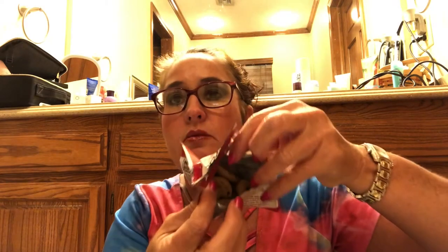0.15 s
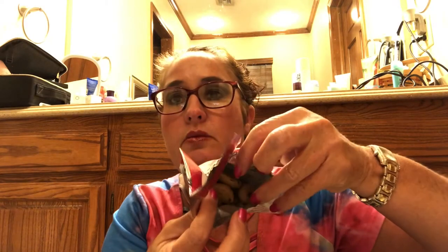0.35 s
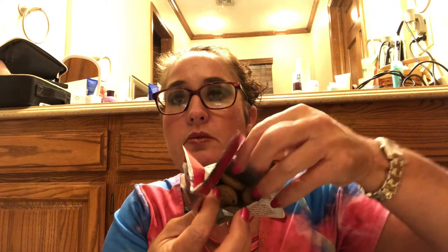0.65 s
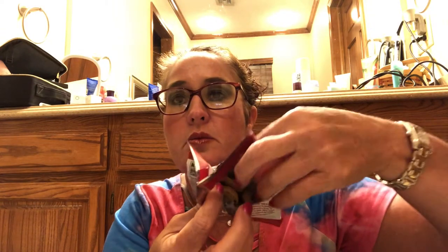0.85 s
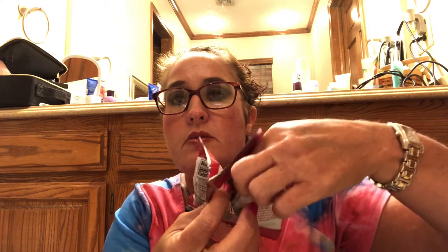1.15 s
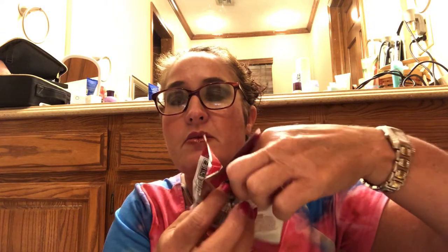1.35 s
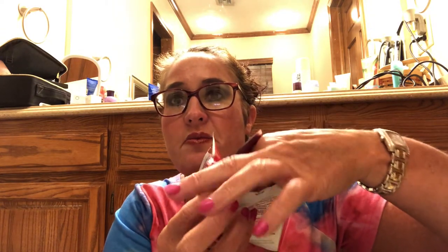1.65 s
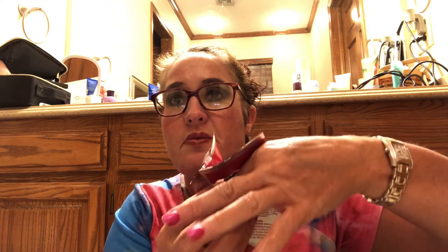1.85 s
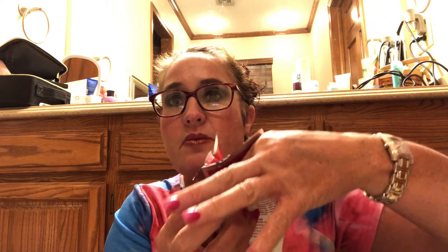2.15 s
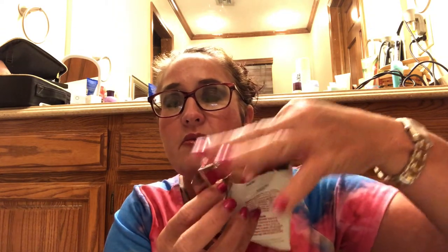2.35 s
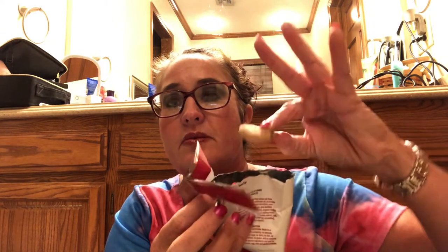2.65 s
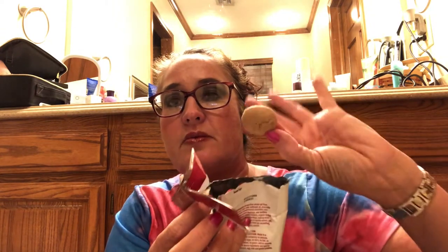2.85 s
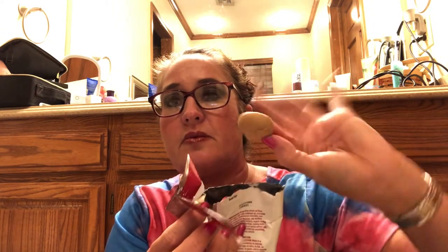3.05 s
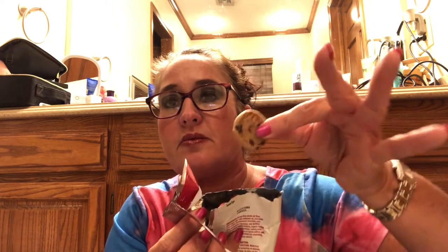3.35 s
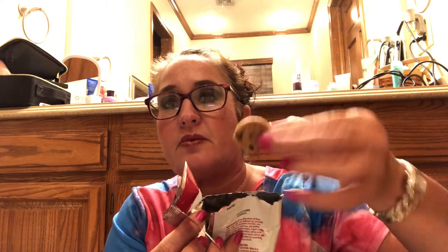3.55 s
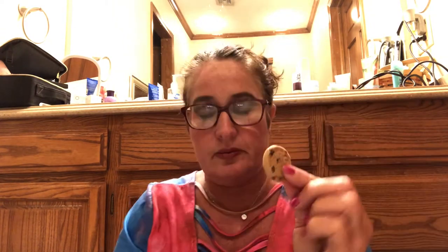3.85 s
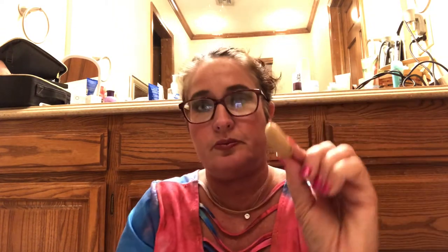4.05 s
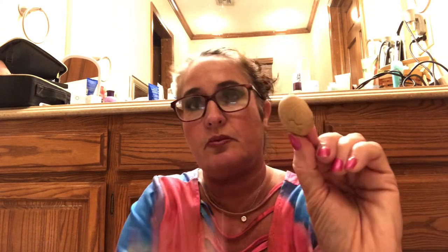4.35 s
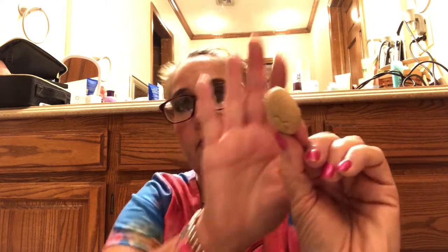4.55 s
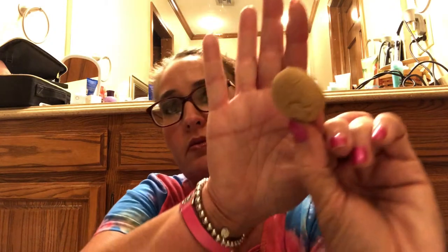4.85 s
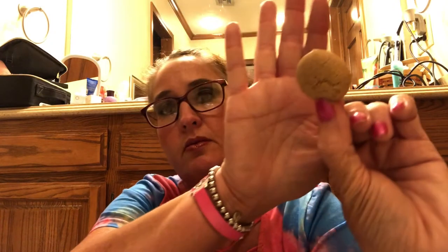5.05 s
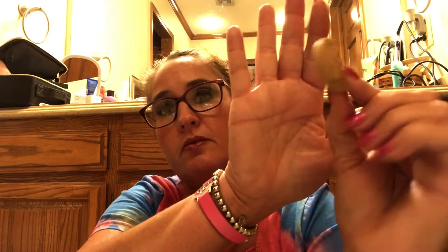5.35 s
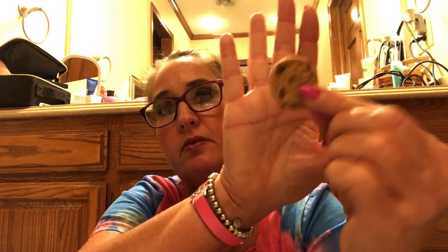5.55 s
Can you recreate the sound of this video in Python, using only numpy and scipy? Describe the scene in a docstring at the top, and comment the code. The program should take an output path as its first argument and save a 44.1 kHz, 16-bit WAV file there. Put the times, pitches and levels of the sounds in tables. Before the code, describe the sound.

A small plastic snack bag is handled close to a small microphone in a hard-walled room. Sparse crinkles grow into sharp snaps and dense rustling with soft low bumps, stop, return briefly with a final loud snap, then leave only low hiss and a faint thin whine, with short echoes after the bag sounds.

```python
"""Fingers digging in a plastic snack bag

Close up in a small hard-walled room. Film creases snap one by one, each a slip and a spray of weaker
slips through a resonant film, over grainy noise for the rustle; soft low bumps are sines plus noise puffs.
Echoes and a decaying tail follow the bag sounds. Coloured noise hisses throughout, a faint sine whines
near the end, and the level dips briefly once."""
import sys
import numpy as np
from scipy import signal
from scipy.fft import rfft, irfft, next_fast_len
from scipy.io import wavfile

SR = 44100
rng = np.random.default_rng(int(sys.argv[2]) if len(sys.argv) > 2 else 0)


def to_wav(s):
    """Save 16-bit WAV."""
    ch = np.atleast_2d(s).T  # columns
    pcm = np.round(np.clip(ch, -1, 1) * 32767)  # PCM
    wavfile.write(sys.argv[1], SR, pcm.astype(np.int16))


N = 252252


def gain_of(db):
    """Amplitude factor of a level in dB."""
    return 10 ** (np.asarray(db) / 20)


def evened(x):
    """Scales to rms 1."""
    return x / np.sqrt(np.mean(x ** 2) + 1e-20)


def peaked(x):
    """Scales to peak 1."""
    return x / np.max(abs(x))


def read(points, hz):
    """Reads a (f/Hz, value) table, linear in log frequency."""
    f, value = np.transpose(points)
    return np.interp(np.log(hz + 1), np.log(f + 1), value)


def along(points):
    """Level columns of a (t/s, level/dB...) table, one value a sample; -150 dB outside."""
    s, *columns = np.transpose(points)
    t = np.arange(N) / SR
    return [np.interp(t, s, column, -150, -150) for column in columns]


def coloured(x, points):
    """Shapes a long sound by a (f/Hz, level/dB) gain curve; rms 1."""
    size = next_fast_len(len(x))
    gain = gain_of(read(points, np.fft.rfftfreq(size, 1 / SR)))
    return evened(irfft(rfft(x, size) * gain, size)[:len(x)])


def band(x, hz, kind):
    """Second-order Butterworth filter."""
    return signal.sosfilt(signal.butter(2, hz, kind, fs=SR, output="sos"), x)


def causal(gain):
    """Minimum-phase impulse response: the shortest ringing with this gain curve."""
    log_gain = np.log(np.concatenate([gain, gain[-2:0:-1]]) + 1e-4)
    return np.fft.ifft(np.exp(log_gain - 1j * signal.hilbert(log_gain).imag)).real


def hiss():
    """Steady room and microphone noise, strongest in the bass and low mids."""
    # hiss spectrum: f/Hz, level/dB (per Hz, relative)
    spectrum = [(26, -34), (45, -8), (120, -8.5), (153, -7.5), (201, -9), (283, -4), (312, -9), (370, -4),
                (418, -8.5), (619, -11.5), (1060, -16), (1570, -21.5), (2500, -23), (15700, -35)]
    rms_db = -68
    return gain_of(rms_db) * coloured(rng.standard_normal(N), spectrum)


def effort():
    """Rustle, boom and fizz gains: grips of the hand rise, hold and sink, linearly in dB."""
    # grips: start t/s, full t/s, letting go t/s, end t/s,
    # rustle level/dB, boom of the bag's air level/dB, fizz of the finest creases level/dB
    grips = [(-0.05, 0.0, 0.023, 0.27, -68, -73, -75), (0.103, 0.25, 0.33, 0.48, -57.5, -67.5, -66.5),
             (0.51, 0.713, 0.9, 0.92, -57.5, -59, -71), (0.875, 0.927, 1.113, 1.43, -56, -60.5, -68),
             (1.355, 1.513, 1.49, 1.66, -52.5, -58, -55.5), (1.58, 1.617, 2.4, 2.13, -66.5, -73, -86),
             (1.948, 2.03, 2.05, 2.026, -47.5, -50, -62), (2.05, 2.12, 2.2, 2.295, -52.5, -54, -52),
             (2.275, 2.41, 2.49, 2.59, -52.5, -53, -58), (3.715, 3.74, 3.74, 3.864, -59.5, -67, -63.5),
             (3.813, 3.92, 4.05, 4.2, -59.5, -79, -70), (4.053, 4.095, 4.1, 4.13, -52.5, -54.5, -56),
             (4.094, 4.145, 4.11, 4.28, -47.5, -46.5, -78), (4.34, 4.493, 4.64, 4.66, -62, -67, -95),
             (4.927, 4.936, 4.957, 4.975, -76.5, -99, -65)]
    rest_db = -16  # start and end, relative to full
    total = 0
    for start_s, full_s, release_s, end_s, *db in grips:
        # end before release: cut off at the end; release before full: joins the sinking line at full
        shape = zip((start_s, full_s, release_s, end_s), (rest_db, 0, 0, rest_db))
        curve = [(s, *(np.array(db) + change_db)) for s, change_db in shape]
        total = total + gain_of(along(curve))
    return total


def crackle(per_s, spread_db, t60):
    """Noise in small dying grains, a few of them large."""
    grain_db = spread_db * np.minimum(rng.exponential(1, N), 3.5)
    starts = gain_of(grain_db) * (rng.random(N) < per_s / SR)
    decay = gain_of(-60 * np.arange(4096) / SR / t60)
    power = signal.oaconvolve(starts ** 2, decay ** 2)[:N]
    return np.sqrt(abs(power)) * rng.standard_normal(N)


def rustle():
    """Countless small creases slip under the fingers, patch by patch, while the bag's air is squeezed."""
    # patches of film: f/Hz, half width/octaves, level/dB
    patches = [(1320, 0.31, 1), (2350, 0.39, 0.5), (4090, 0.3, 2.5), (6400, 0.22, -4.5)]
    # spectrum of the squeezed air: f/Hz, level/dB (per Hz, relative)
    boom_spectrum = [(40, -23), (100, -4.5), (200, -1.5), (450, 0), (900, -5.5), (1500, -19)]
    # spectrum of the finest creases: f/Hz, level/dB (per Hz, relative)
    fizz_spectrum = [(5000, -33), (7500, 1), (9500, -7.5), (11800, -6), (13000, -2.5), (16500, -1.5)]
    rustle_gain, boom_gain, fizz_gain = effort()
    film = np.zeros(N)
    for hz, half_oct, db in patches:
        edges_hz = hz * 2. ** np.array([-half_oct, half_oct])
        film += gain_of(db) * band(crackle(per_s=260, spread_db=3.5, t60=0.023), edges_hz, "band")
    air = boom_gain * coloured(crackle(per_s=200, spread_db=2.6, t60=.03), boom_spectrum)
    fizz = fizz_gain * coloured(crackle(per_s=700, spread_db=4, t60=.01), fizz_spectrum)
    return rustle_gain * evened(film) + air + fizz


def bumps():
    """Fingers bump the bag and the snacks in it: a dying low sine plus a puff of noise around it."""
    # bumps: t/s, dry peak level/dB, f/Hz
    pushes = [(0.017, -51, 132), (0.202, -49, 229), (0.324, -40.5, 235), (0.63, -43, 174), (0.77, -43, 214),
              (1.03, -52, 86.5), (1.289, -53.5, 632), (1.418, -45, 244), (1.539, -47, 260),
              (2.102, -35.5, 270.7), (2.533, -46, 160), (4.553, -47.5, 232)]
    t60_s, attack_s = .11, 0.00062
    out, t = np.zeros(N), np.arange(8192) / SR
    fade = gain_of(-60 * t / t60_s)
    for s, db, hz in pushes:
        noise = rng.standard_normal(len(t)) * fade * (1 - np.exp(-t / attack_s))
        puff = peaked(band(noise, [.5 * hz, 3.35 * hz], "band"))
        push = np.sin(2 * np.pi * hz * t) * fade + 2.2 * puff
        out[round(s * SR):][:len(t)] += gain_of(db) * peaked(push)
    return out


def snap(db, hz, overtone_hz, overtone_db, bright_db):
    """One sharp slip and a spray of weaker ones ring the film; returns direct sound and room feed."""
    spray, spray_t60_s, room_share_db = 0.15, 0.019, -7
    thump_db = -21 - 0.58 * bright_db  # a dull crease pumps the bag's air more
    t, f = np.arange(1024) / SR, np.fft.rfftfreq(2048, 1 / SR) + 1
    # f/Hz, half width/octaves, level/dB: ring, overtone, air, film, crease
    bumps_of_gain = [(hz, 0.25, 0), (overtone_hz, .2, overtone_db),
                     (707, 0.76, thump_db), (2520, 0.89, -8.5), (8800, 1.0, bright_db)]
    power = sum(gain_of(level_db) ** 2 * np.exp(-(np.log2(f / centre_hz) / half_oct) ** 2)
                for centre_hz, half_oct, level_db in bumps_of_gain)
    ring = causal(np.sqrt(power))[:1024]
    slips = spray * rng.standard_normal(len(t)) * gain_of(-60 * t / spray_t60_s)
    slips[0] = 1
    ahead = signal.fftconvolve(slips, ring)
    ahead *= np.linalg.norm(ring) / np.linalg.norm(ahead)  # the spray spreads the energy, adds none
    around = gain_of(room_share_db) * np.pad(ring, (0, 1023))
    return gain_of(db) * np.array([ahead, around]) / np.max(abs(ahead))


def snaps(count=160):
    """Large creases buckle at set moments, small ones at random, as strong as the grip."""
    # large creases: t/s, dry peak level/dB, ring f/Hz, overtone f/Hz, overtone level/dB, brightness level/dB
    creases = [(0.022, -39.5, 1120, 3220, 1, -45), (0.045, -39, 1500, 3910, -11, -27),
               (0.179, -38, 1000, 4310, 2.5, -10), (0.202, -36.5, 1470, 3200, -21, -24),
               (0.231, -32, 1560, 4400, -22, -44), (0.245, -31, 1640, 3930, -6, -24),
               (0.296, -31.5, 2260, 4500, -17, -21), (0.325, -31, 1510, 4600, -4, -30),
               (0.336, -29.5, 1250, 3280, -11, -28), (0.521, -45, 2500, 4490, 3, -8.5),
               (0.554, -39, 1680, 5570, -9, -16), (0.6, -34.5, 1679, 3800, -3, -28),
               (0.632, -34, 1410, 3670, -13, -34), (0.674, -27, 1400, 3880, -22, -34.5),
               (0.75, -30, 2370, 4140, 0, -31), (0.781, -25.5, 1240, 5040, -8, -13.5),
               (0.817, -32, 1590, 3290, -10, -16), (0.927, -31, 1620, 5310, -17, -15),
               (0.944, -32.5, 2460, 4230, 0, -4), (0.965, -29.5, 3050, 4840, -2, -24),
               (1.018, -35, 1140, 4260, 10, -11), (1.08, -34, 1870, 3950, -12, -32),
               (1.139, -10.5, 2600, 7100, -4.5, -8.5), (1.382, -34, 1500, 3370, -18, -37),
               (1.397, -35, 920, 3810, -24, -49), (1.418, -23.5, 2970, 3920, 3, -14),
               (1.434, -7.5, 1850, 4340, 3, -6), (1.495, -21.5, 2370, 4170, 18, 7),
               (1.548, -33, 1630, 3750, -17, -36), (1.56, -31.5, 1020, 3970, -30, -24),
               (1.647, -27.5, 1180, 7800, -7.5, -18), (1.699, -36.5, 2360, 4250, -22, -34),
               (1.719, -37, 1580, 3590, -1, -14), (1.738, -31, 1900, 4160, -19, -26.5),
               (1.804, -41, 2800, 6490, 8, 0), (1.815, -17.5, 2080, 5350, 7, -4),
               (1.927, -28, 1700, 3670, 1.5, -24), (1.947, -38, 1230, 3820, -15, -35),
               (1.974, -22.5, 2670, 3600, 3.5, -9.5), (1.989, -27, 1850, 6150, -15, -15),
               (2.007, -18, 2700, 7000, -2.5, -15), (2.045, -25.5, 1740, 4270, -9, -28.5),
               (2.075, -17, 1490, 4200, -1.5, -22.5), (2.092, -24.5, 2980, 5880, 1, -21),
               (2.107, -20, 2420, 5830, 1, -15), (2.204, -35, 1560, 3200, -10, -15),
               (2.243, -15, 1580, 3500, 5.5, -7), (2.264, -27.5, 1930, 4030, -12, -45),
               (2.311, -23.5, 1800, 3390, -24, -29), (2.363, -38.5, 1410, 5560, 0, -16),
               (2.387, -32.5, 2520, 3260, -5, -24), (2.402, -29.5, 1560, 3810, -17, -37),
               (2.434, -34, 1570, 3990, -16, -23), (2.485, -18.5, 1380, 3900, -29, -31.5),
               (2.519, -27.5, 1380, 4020, -8, -6), (2.551, -27.5, 2560, 3580, -25, -27),
               (2.67, -47, 2790, 3740, 1, -17), (2.805, -41.5, 1440, 5630, 1.5, -10.5),
               (2.839, -34.5, 1800, 4820, -19, -35), (3.378, -27, 1760, 3570, -2.5, -35.5),
               (3.758, -42.5, 2220, 3260, -14, -24), (3.779, -38, 1480, 3670, -1, -19),
               (3.795, -31, 1330, 4360, 4, -6), (3.841, -41, 2480, 3760, -6, -16),
               (3.868, -33, 2770, 6850, 0, -19), (3.878, -28.5, 2150, 3930, -8, -26.5),
               (3.904, -26.5, 2870, 3920, 0, -21), (3.972, -34.5, 1940, 3850, -21, -32),
               (4.037, -30, 2160, 3470, -20, -26.5), (4.075, -33.5, 2460, 6040, -1, 10),
               (4.104, -27.5, 2480, 3200, -10, -25), (4.143, -23, 1640, 3300, -4.5, -23),
               (4.152, -28, 910, 3500, -14, -35), (4.16, -26.5, 1210, 2900, -4, -39),
               (4.212, -34.5, 2450, 3520, 15, -39), (4.444, -45.5, 1030, 3400, -24, -21),
               (4.489, -37.5, 1450, 3370, 1, -44), (4.546, -15, 2760, 4470, 2.5, -10.5)]
    small_db, small_range_db = 24, 10.5  # largest peak over the rustle gain, range below it
    # (low, high): t/s, ring f/Hz, overtone f/Hz, overtone level/dB, brightness level/dB, luck
    small_ranges = [(0, N / SR), (1000, 2690), (3350, 5800), (-24, -1.5), (-40.5, -11.5), (0, 1)]
    out, grip = np.zeros((2, N + 2048)), effort()[0]
    for s, *row in creases:
        out[:, round(s * SR):][:, :2047] += snap(*row)
    low, high = np.transpose(small_ranges)
    for s, *colour, luck in low + (high - low) * rng.random((count, 6)):
        at = int(s * SR)
        out[:, at:at + 2047] += grip[at] * snap(small_db - small_range_db * luck, *colour)
    return out[:, :N]


def room(ahead, around, wet_db):
    """Near echoes, then sparse taps of random sign, each band dying at its own speed."""
    # decay: f/Hz, t60/s
    decay = [(150, 0.22), (800, 0.4), (2000, 0.48), (5500, 0.5), (9000, 0.3), (15000, 0.12)]
    # initial tail spectrum: f/Hz, level/dB
    colour = [(150, -0.5), (600, 1), (1500, 1), (4000, -4.5), (8000, 1), (15000, -4)]
    # echoes off hands, chest and cupboard: t/s, level/dB (before the treble loss)
    echoes = [(.0021, -19), (.0037, -16.5), (.0062, -13.5), (0.013, -17)]
    taps, near = np.zeros(SR), np.zeros(1024)
    at = np.arange(200, SR - 10, 10) + rng.integers(0, 10, (SR - 201) // 10)
    taps[at] = rng.choice([-1., 1.], len(at))
    hz, t, z = signal.stft(taps, SR, nperseg=256)
    tail_db = read(colour, hz)[:, None] - 60 * t / read(decay, hz)[:, None]
    tail = signal.istft(z * gain_of(tail_db), SR, nperseg=256)[1]
    for s, db in echoes:
        near[round(s * SR)] = gain_of(db)
    near = band(near, 10000, "low")  # skin and cloth soak up the treble
    near[0] = 1  # direct sound
    ringing = gain_of(wet_db) * signal.fftconvolve(around, tail / np.linalg.norm(tail))
    return signal.oaconvolve(ahead, near)[:N] + ringing[:N]


def whine():
    """A thin steady-pitched sine that swells and fades near the end."""
    # whine: t/s, rms level/dB
    swell = [(4.8, -92), (4.82, -79.5), (5.114, -80), (5.152, -87), (5.23, -76), (5.37, -72.5),
             (5.512, -70), (5.576, -85), (5.64, -90), (5.688, -81), (5.72, -73)]
    hz = 1113
    tone = np.sqrt(2) * np.sin(2 * np.pi * hz * np.arange(N) / SR)
    return gain_of(along(swell)[0]) * tone


def scene():
    """Bag sounds in the room, over hiss and whine; one channel."""
    rubbing, pushes = rustle(), bumps()
    bag = room(*snaps(), wet_db=0.5)
    bag += room(pushes, pushes, wet_db=-4.0)
    bag += room(rubbing, rubbing, wet_db=-2.5)
    return (bag + hiss() + whine())[None]


def record(dry):
    """The small microphone drops the deep bass; the level dips briefly; a low-pass limits the band."""
    # level dip, end values held before and after: t/s, level/dB
    dip = [(3.7, -1.5), (3.722, -10), (3.733, -31), (3.743, -9.5), (3.762, -1)]
    edge_hz = 15850
    s, db = np.transpose(dip)
    level = gain_of(np.interp(np.arange(N) / SR, s, db))
    dipped = band(dry, 60, "high") * level
    low_pass = signal.firwin(127, edge_hz, window=("kaiser", 9), fs=SR)
    return signal.oaconvolve(dipped, low_pass[None], "same")


dry = scene()
out = record(dry)
to_wav(out)
```